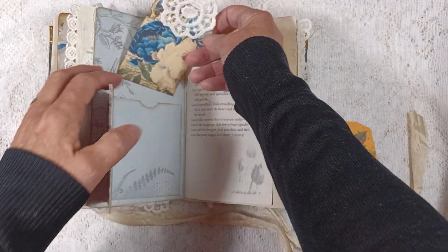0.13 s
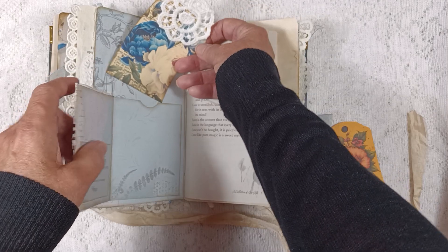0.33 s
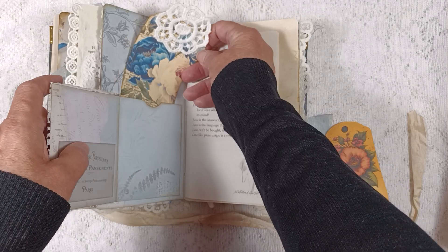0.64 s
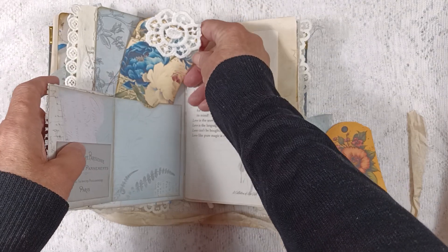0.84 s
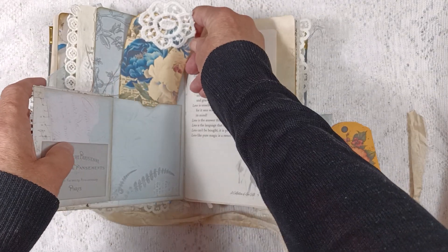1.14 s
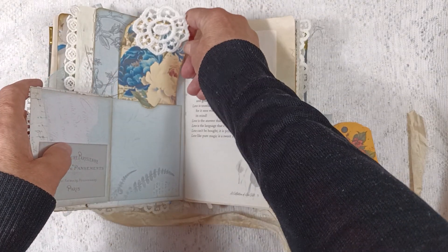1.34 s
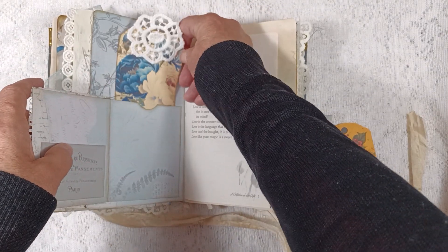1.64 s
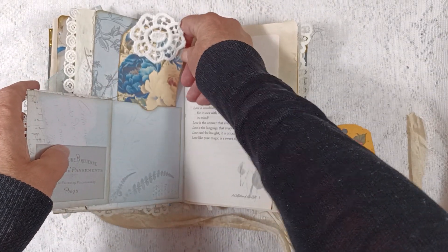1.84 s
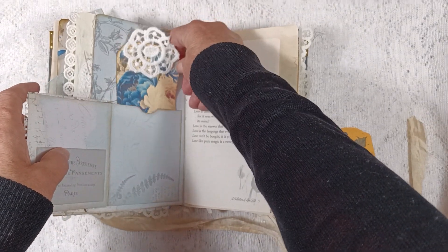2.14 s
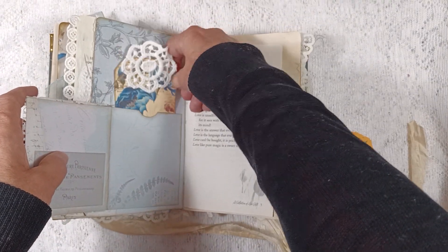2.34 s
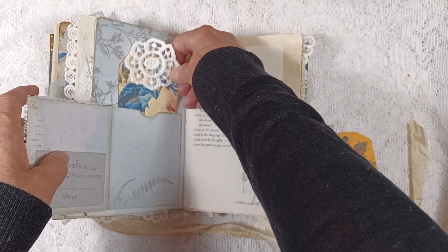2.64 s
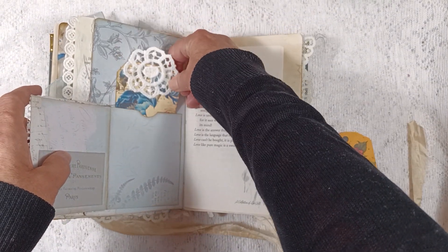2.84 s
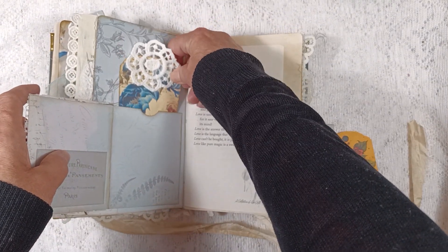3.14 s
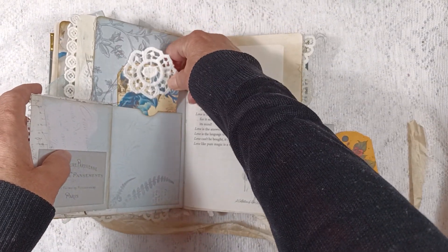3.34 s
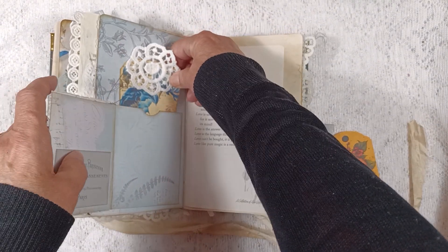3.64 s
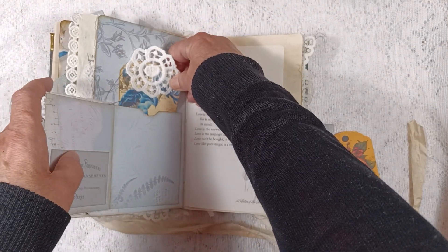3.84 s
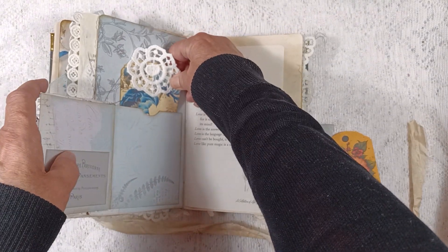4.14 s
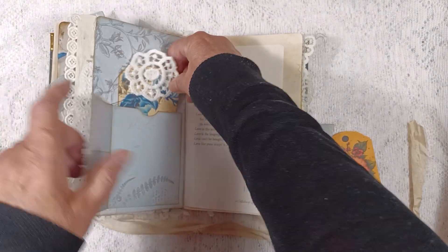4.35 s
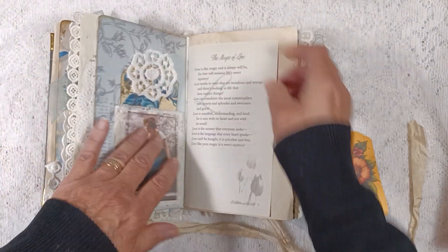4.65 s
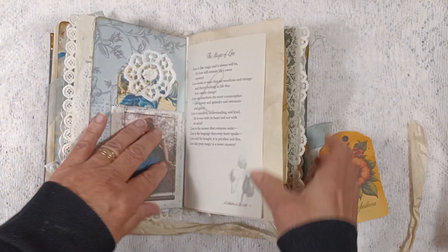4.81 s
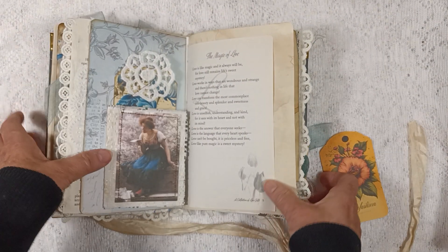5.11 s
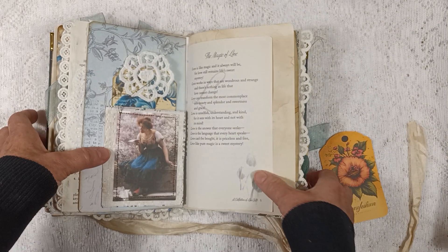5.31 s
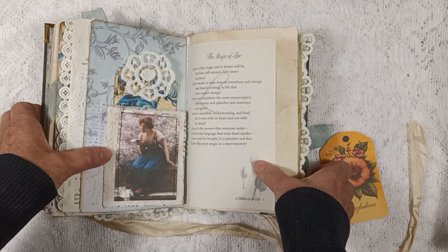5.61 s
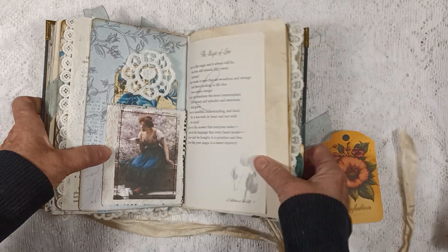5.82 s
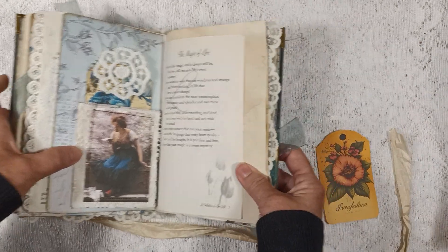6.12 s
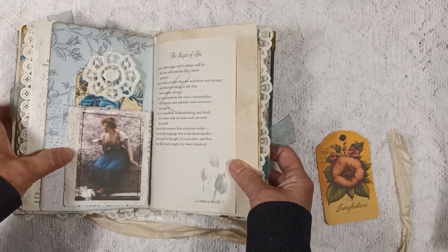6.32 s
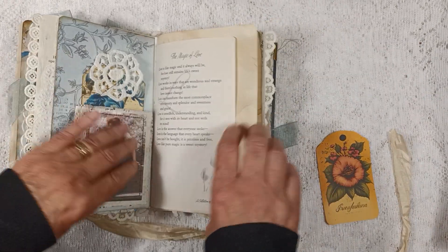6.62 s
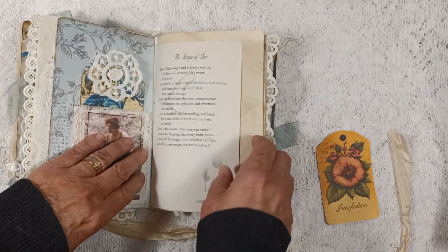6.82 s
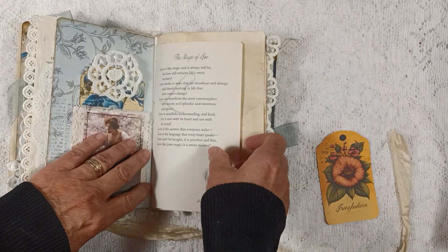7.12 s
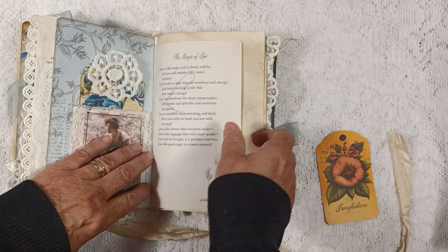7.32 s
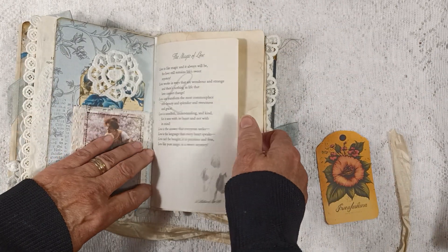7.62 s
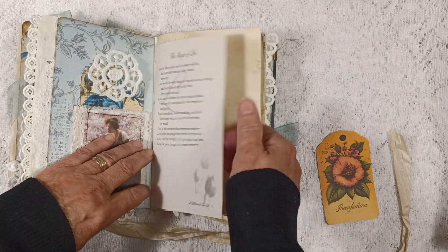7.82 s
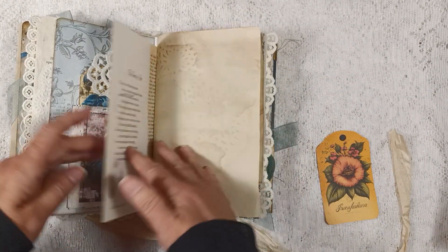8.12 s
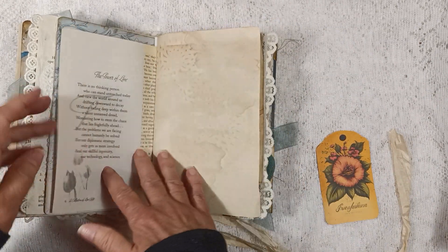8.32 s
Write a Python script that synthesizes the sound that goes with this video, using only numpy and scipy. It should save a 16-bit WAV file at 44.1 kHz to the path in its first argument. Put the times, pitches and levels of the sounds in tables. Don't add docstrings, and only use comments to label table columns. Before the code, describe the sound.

A quiet, nearly dry room, heard close over a table through a small mono microphone. From 0 to 0.8 s a card tag scrapes brightly on paper, with ticks and small crease snaps. From 0.8 to 1.4 s it enters a pocket in softer, slightly hollow rubs. Short shoves follow at 1.7 and 2.4-2.8 s, then sparse faint scuffs, nearly silent around 4 s. At 4.4-4.9 s a flap closes with crisp snaps and rustle. The book drags over cloth, swelling near 5.4 s, and settles with ticks and a sharp snap at 6.0 s. After a lull near 6.3 s, page handling bursts in at 6.55-6.8 s, the loudest rustle, then crackles, clicks and dull pops until 7.8 s. The page swings over in an airy brush and lands with a bright snap at 8.4 s. Soft low thumps and faint hiss lie beneath.

```python
import sys
import numpy as np
from scipy import signal
from scipy.fft import rfft, irfft, next_fast_len
from scipy.io import wavfile
from scipy.ndimage import uniform_filter1d, map_coordinates

SR = 44100
rng = np.random.default_rng(int(sys.argv[2]) if len(sys.argv) > 2 else 0)


def volts_from_db(level):
    exponent = np.asarray(level, float) / 20
    return 10 ** exponent


def transcribe(signal):
    frames = np.atleast_2d(signal).T
    limited = np.clip(frames, -1, 1)
    pcm = np.round(limited * 32767).astype(np.int16)
    wavfile.write(sys.argv[1], SR, pcm)


N = 373191

# (centre [Hz], width [Hz], level [dB])
DEEP_MODES = [(50.8, 9.6, -1.6), (81.5, 12.3, -0.39)]
HUM_MODES = [(124, 8.1, 1), (199, 40, -9)]
COVER_MODES = [(280, 42, 9.5), (439, 18, -1)]
# (deep [dB], hum [dB], cover [dB])
REST_DB = (-77, -75, -81)
# (time [s], level [dB], half length [s])
LEANS = [(.05, -69, 0.11), (0.774, -64, 0.16), (1.348, -65.5, 0.21), (1.94, -63.5, 0.086),
         (2.247, -65.5, 0.079), (2.81, -64, 0.099), (5.183, -74.5, 0.32), (5.412, -74, 0.2),
         (6.613, -67, 0.13), (7.266, -66, 0.038), (7.55, -71, 0.069), (8.4, -74, 0.12)]
# (time [s], hum level [dB], half length [s], cover modes over the hum [dB])
FLEXES = [(0.726, -69.5, 0.12, -5), (1.25, -73, 0.28, -10), (1.37, -61, 0.039, -6),
          (1.48, -65.5, 0.031, -15), (1.644, -62.5, 0.046, -17), (1.737, -62, 0.048, -3),
          (1.82, -62.5, .04, -4.5), (5.484, -81.5, 0.31, 7.5), (6.4, -64, 0.054, -2), (6.6, -65, 0.085, 0),
          (6.973, -85, 0.04, 19), (7.22, -73.5, 0.11, 7), (7.455, -63, 0.03, -21), (7.554, -87, 0.044, 9),
          (8.203, -74.5, 0.29, 1.5)]
# (frequency [Hz], density [dB per Hz])
AIR_COLOUR = [(210, -43), (350, 1.5), (914, 2.5), (1700, -3.5), (2200, 2), (2800, -2.5), (8570, -11.5),
              (10900, -24.5), (16000, -16)]
# (frequency [Hz], t60 [s])
ROOM_DECAY = [(200, 0.15), (2000, 0.11), (10000, 0.023)]

# (time [s], level [dB], pitch [Hz], length [s])
WHISTLES = [
    (3.153, -74, 1114, 0.05),
    (3.39, -76.5, 3900, 0.095),
    (4.142, -72, 1267, 0.061),
    (6.121, -74, 3470, 0.083),
]
# (time [s], peak [dB], pitch [Hz])
TICKS = [(0.5244, -32, 8800), (0.5444, -35, 8470), (0.552, -36, 8870), (1.0475, -47, 8450),
         (1.0679, -38, 8800), (3.1667, -44, 4500), (3.6424, -38, 8980), (4.5544, -31, 7890),
         (4.609, -33, 4600), (4.532, -39, 8600), (4.541, -32, 5640), (4.6623, -41, 8440),
         (5.0206, -36, 8600), (5.8436, -35, 8200), (5.8654, -28, 9100), (5.8898, -37, 8880),
         (5.918, -38, 7000), (6.0538, -30, 8700), (6.9641, -34, 7410), (7.05, -34, 8000),
         (7.1404, -37, 7500), (7.5494, -39, 8630), (7.1338, -35, 5000), (7.7124, -28.5, 3350),
         (7.9394, -36, 8700), (8.3914, -31, 7000)]
# (time [s], peak [dB], pitch [Hz], ring [cycles])
POPS = [(0.789, -52, 844, 14), (1.047, -52, 880, 3.7), (1.359, -52, 280, 4.1), (4.788, -52.5, 826, 17),
        (5.423, -33, 1010, 1.8), (5.853, -46, 1440, 3.6), (5.989, -52, 960, 4.2), (6.455, -50.5, 900, 17),
        (6.598, -50, 824, 7.7), (6.772, -39, 1380, 3.8), (6.936, -45, 800, 7.7), (6.9645, -32.5, 425, 2.7),
        (6.976, -32.5, 1330, 4.6), (7.1405, -40.5, 900, 4.9), (7.254, -42.5, 827, 10.6),
        (7.5359, -34, 405, 2.6), (7.55, -47, 420, 3.6), (7.6326, -30.5, 1430, 4.3),
        (7.64, -22.5, 785, 1.67), (7.805, -43.5, 1420, 9.7), (7.955, -51, 880, 7.3),
        (8.3906, -24, 4640, 10), (8.3896, -24.5, 3250, 8), (8.3979, -26.5, 6900, 20),
        (8.394, -43.5, 1070, 8.6)]
# (time [s], peak [dB], dull part over peak [dB], t60 [s])
SNAPS = [(0.618, -24, -26, 0.0078), (0.77, -30, -3, 0.013), (0.791, -47, 15, 0.021),
         (0.817, -37, 6, 0.013), (.837, -30, 2, .015), (.977, -50, 6, 0.025), (1.048, -44, -12, 0.016),
         (1.36, -30, -10, 0.02), (1.3782, -27, -26, 0.024), (1.659, -24.5, -11, 0.024),
         (1.905, -40, -10, 0.02), (2.35, -38.5, -24, 0.15), (2.455, -41, -16.5, 0.02),
         (2.7676, -35, -25, 0.021), (3.063, -47, 8, 0.017), (3.6155, -26, -24, 0.0087),
         (4.449, -37, -20, 0.029), (4.6033, -18.5, 1, 0.01), (4.66, -24.5, -8, 0.025),
         (4.789, -30, 13.5, 0.018), (4.9044, -32, -36, 0.035), (4.9267, -28.5, -24, 0.034),
         (5.9183, -32, -26, 0.011), (5.962, -30, -24, 0.021), (6.0079, -14.5, 9, 0.0064),
              (6.0374, -33, -15, 0.01), (6.0518, -28, -19, 0.007), (6.063, -31.5, -12, 0.026),
              (6.472, -31, -18, 0.015), (6.55, -17, -6, 0.012), (6.7468, -22, -22, 0.025),
              (6.9344, -19, 3, 0.008), (6.966, -22, 16, 0.0059), (6.978, -20, -12, 0.013),
              (7.133, -24.5, -16, 0.02), (7.533, -22, 11.5, 0.018), (7.552, -23, -20, 0.014),
              (7.633, -19, -8, 0.012), (7.715, -28, -6, .008), (7.8042, -18, 2, 0.027),
              (7.834, -18, -22, 0.0099), (8.245, -39, -10, 0.0091), (8.389, -30, 10, 0.014),
              (8.397, -36, -11, 0.014)]

# (centre [Hz], width [Hz], level [dB])
POCKET_MODES = [(1880, 1040, -3), (2990, 780, -0.5)]
BODY_MODES = [(532, 370, -2.5), (900, 97, 4.5), (1550, 455, 2)]
# (centre [Hz], width [Hz], level [dB])
COARSE_BANDS = [(4120, 1330, 0), (5705, 650, 2.5)]
FINE_BANDS = [(6650, 910, -3.5), (8916, 594, -0.5)]
# (frequency [Hz], density [dB per Hz])
SHEEN_COLOUR = [(9000, -9.5), (9900, 9), (12000, 9.5), (15500, 8.5), (16500, -40)]
# (time [s], pocket [Hz], body [Hz], strength of both resonances [dB], facing the microphone [dB])
HOLD = [(0.1, 2680, 860, 10.5, 12), (.29, 2500, 1510, 8, 4), (.45, 2410, 1010, 13, 5.5),
        (.8, 2390, 820, 22, -11), (1.08, 2400, 870, 24, -4), (1.25, 2520, 840, 11, -13),
        (1.4, 2650, 850, 30, -6), (1.7, 2450, 900, 14.5, -7), (2.42, 2870, 850, 12.5, -6.5),
        (4.1, 2930, 1200, 3, -10), (4.55, 2300, 1430, 2, 3.5), (4.75, 2930, 900, 3, 8),
        (5.0, 2800, 1810, 12.5, 1), (5.36, 1890, 1460, 8, -7), (5.43, 1690, 515, 3, -11),
        (5.72, 2300, 1500, -24, 5.5), (6.6, 2600, 1400, -12, -1.5), (6.78, 3280, 1400, 3, -5),
        (6.9, 2620, 1310, -1, -4.5), (7.4, 3200, 890, 5, -18), (7.9, 2950, 1300, -7, -1.5),
        (8.1, 3070, 900, 15, 8), (8.25, 3420, 644, 12.5, 0.5)]
# (time [s], coarse hiss [dB], pocket ring [dB])
GRIT = [(0, 3, 0.5), (.8, 1, 2.5), (.95, -4, 0), (1.05, 1, 3), (1.2, -1.5, -3), (1.4, 1.5, -3.5),
        (1.68, 0, 1.5), (1.82, -1.5, 6.5), (2.2, 0.5, -1), (2.38, 2.5, -4.5), (2.8, 1.5, 1.5),
        (3.35, 2.5, -5.5), (3.62, 1.5, -8), (4.45, -1, -7), (4.55, 0, 0), (4.7, 2, 7.5), (5.0, -1.5, -3),
        (6.5, -4, -6), (6.6, -7, -9), (6.69, -4, -6), (6.8, 5, 0.5), (7.15, -2, -2.5), (7.8, 2, 1.5),
        (7.95, -1, -1), (8.23, 5.5, -2), (8.4, 0.5, -0.5)]
# (time [s], centre [Hz], width [octaves], depth [dB])
SHADE = [(.88, 6030, 0.21, 1.5), (.95, 6700, 0.17, 24), (1.0, 6740, 0.33, -0.5), (1.65, 1450, 0.38, 1.5),
         (2.43, 1450, 0.33, 8), (2.5, 1580, 0.45, 6), (4.4, 1500, 0.63, 7), (4.53, 1510, 0.36, -2),
         (5.08, 4650, 0.22, 1), (5.12, 4600, 0.33, 12), (5.25, 4330, 0.23, 7), (5.49, 3520, 0.58, 3.5),
         (5.53, 3580, 0.95, 8.5), (5.66, 3670, 3.8, 19), (5.7, 3620, 0.86, 3.5), (6.45, 6500, 0.5, 2.5),
         (6.53, 6600, 0.14, 11), (6.62, 6860, 0.18, 2.5), (7.9, 597, 0.45, -1), (7.97, 700, .5, 11),
         (8.04, 1265, 0.76, 4), (8.1, 2400, 1.1, 14), (8.14, 4470, 0.4, -1), (8.17, 5970, .3, 1.5),
         (8.255, 1200, 0.57, 2), (8.275, 1530, 0.63, -5), (8.38, 1600, 0.55, 5), (8.392, 1400, 0.54, -4)]

# (time of peak [s], fibre hiss [dB], rise [s], fall [s], weight on the sheet [dB])
SEEK = [
    (0.018, -44.5, 0.44, 0.23, -4.5),
    (.062, -46, 0.022, 0.027, -18),
    (.22, -51.5, 0.1, 0.82, 4.5),
    (.42, -52, 0.96, 0.13, -13.5),
    (.51, -47.5, 0.027, 0.086, 4),
    (.547, -46, 0.081, 0.26, -13),
    (.708, -44.5, 0.038, 0.058, -12),
]
ENTER = [
    (.832, -56, 0.38, 0.086, 8),
    (.984, -54.5, 0.017, 0.18, -4),
    (1.045, -48, 0.037, 0.035, 1.5),
    (1.085, -45.5, 0.059, 0.079, 0.5),
    (1.13, -52, 0.054, 0.039, 3.5),
    (1.205, -57.5, 0.014, 0.065, 1),
    (1.29, -57, 0.16, 0.089, 2.5),
    (1.402, -51.5, 0.065, 0.041, 4.5),
]
PUSH = [(1.662, -44, 0.01, 0.04, -14), (1.701, -43.5, 0.05, 0.06, 3.5), (1.765, -56.5, 0.088, 0.12, 12),
        (1.803, -49, 0.015, 0.038, 15.5), (1.826, -53, 0.039, 0.035, -2), (1.55, -73, 0.15, 0.088, 5),
        (1.91, -54, 0.02, .04, -4), (1.94, -58, 0.068, 0.033, -5), (2.2, -59, 0.19, 0.64, 8),
        (2.28, -53, 0.02, 0.24, 6.5), (2.36, -50, 0.04, 0.053, 3), (2.4, -49.5, 0.07, 0.027, 9.5),
        (2.468, -40, 0.021, 0.0044, -1), (2.48, -53.5, 0.025, 0.077, -20),
        (2.569, -63.5, 0.0048, 0.027, -11), (2.61, -58.5, 0.017, 0.067, 0), (2.771, -47, 0.018, 0.08, -22),
        (2.799, -46.5, 0.044, 0.036, -12), (2.87, -63, 0.12, 0.093, 1), (3.07, -52.5, 0.015, .07, -9),
        (3.11, -54, 0.057, 0.064, 1), (3.32, -57, 0.028, 0.11, 4), (3.375, -52.5, 0.093, 0.018, -8),
        (3.65, -64.5, .02, 0.045, -23), (3.617, -43, 0.01, 0.029, -40), (3.8, -72.5, 0.088, 0.057, -14),
        (4.164, -70, 0.054, 0.044, 16.5), (3.865, -74, 0.013, 0.026, -10), (4.343, -48.5, 0.016, 0.02, -8),
        (4.33, -57, 0.052, 0.06, 4), (4.385, -60.5, 0.066, 0.043, 9.5)]
SHIFT = [(4.455, -52.5, 0.014, 0.29, -11.5), (4.525, -49.5, 0.014, 0.046, 8), (4.552, -49, 0.051, 0.041, 1),
         (4.6, -51.5, 0.068, 0.076, 3.5), (4.668, -46, 0.078, 0.16, -11), (4.732, -44, 0.036, 0.076, -16),
         (4.784, -48.5, 0.029, 0.049, 5.5), (4.928, -47.5, 0.027, 1, -6), (5.15, -58.5, 0.33, 0.82, 24),
         (5.29, -50.5, 0.29, 0.11, -2), (5.352, -41, 0.08, 0.066, 2), (5.392, -43, 0.1, 0.023, 2)]
SETTLE = [(5.44, -51.5, 0.07, 0.15, 16), (5.57, -49, 0.044, 0.096, 8), (5.629, -60, 0.059, 0.12, 32),
          (5.709, -54, 0.057, 0.043, 9.5), (5.75, -58.5, .04, 0.1, 13), (5.798, -49, 0.025, 0.022, 6.5),
          (5.838, -45.5, 0.066, 0.11, 0), (5.972, -50.5, 0.039, 0.066, -2), (6.01, -48, 0.055, 0.15, -0.5),
          (6.12, -61.5, 0.61, 0.097, 14), (6.308, -70, 0.057, 0.19, 17), (6.361, -62.5, 0.025, 0.13, 0),
          (6.461, -61, 0.22, 0.21, 3.5)]
TURN = [(6.526, -49, 0.0097, 0.055, -12), (6.553, -37.5, 0.041, 0.026, -1), (6.58, -42.5, 0.057, 0.2, -3.5),
        (6.698, -39, 0.097, 0.038, 2), (6.756, -34.5, 0.018, 0.054, -5), (6.775, -36, 0.04, 0.065, 2),
        (6.813, -38.5, 0.089, 0.06, 0), (6.982, -43.5, 0.16, 0.1, 7.5), (7.034, -41, 0.032, 0.05, 4),
        (7.052, -43, 0.033, 0.044, 3), (7.135, -43.5, 0.014, 0.02, 10.5), (7.11, -49, 0.13, 0.094, 4.5),
        (7.262, -41, .15, 0.12, 4.5), (7.295, -45.5, 0.051, 0.13, -5.5), (7.4, -52, 0.14, 0.083, 9),
        (7.464, -46, 0.054, 0.12, 5.5), (7.55, -46.5, 0.028, 0.34, 6), (7.711, -46, 0.2, 0.084, 4.5)]
SWING = [
    (7.807, -47, 0.018, 0.42, 10.5),
    (7.93, -47.5, 0.18, 0.29, -3.5),
    (8.09, -56, 0.15, 0.2, -23),
    (8.18, -52, 0.12, 0.094, 11),
    (8.239, -44.5, 0.1, 0.041, 4.5),
    (8.31, -48.5, 0.24, 0.44, -8.5),
    (8.398, -41.5, 0.028, 0.048, 7.5),
]
# (pocket ring [dB], sheet body [dB], sheen [dB], coarse over fine [dB])
SHEETS = [
    (-7, -13, -18.5, -2),
    (-2.5, -15, -21, -3),
    (-6, -19.5, -16.5, -3),
    (-12, -13.5, -14.5, -4),
    (-5.5, -15, -15.5, 2.5),
    (-9.5, -14.5, -12.5, -3.5),
    (-5, -16.5, -14.5, -3),
]
# (pocket [dB/dB], body [dB/dB], sheen [dB/dB], coarseness [dB/dB])
WEIGHT_MOVES = (0.19, 1.34, -0.2, 0.16)
# (pocket [dB/dB], body [dB/dB], sheen [dB/dB], coarseness [dB/dB])
FACING_MOVES = (-0.091, 0.25, 0.46, -0.16)
# (pocket [s], body [s], sheen [s], coarse hiss [s])
LAG_S = (0.0016, 0.016, .001, 0.0019)


def unit(x):
    return x / np.sqrt(np.mean(x ** 2) + 1e-20)


def along(points, hz):
    f, v = np.transpose(points)
    return np.interp(np.log(hz + 1), np.log(f + 1), v)


def curves(rows):
    s, *cols = np.transpose(rows)
    return [np.interp(np.arange(N) / SR, s, c) for c in cols]


def wobble(rate):
    knots = rng.standard_normal(int(N * rate / SR) + 4)
    return map_coordinates(knots, [np.arange(N) * rate / SR])


def filtered(x, response):
    m = next_fast_len(len(x) + 8192)
    return irfft(rfft(x, m) * response(np.fft.rfftfreq(m, 1 / SR)), m)[:len(x)]


def coloured(x, points):
    return filtered(x, lambda f: volts_from_db(along(points, f)))


def no_bass(corner_hz):
    return lambda f: (1j * f / corner_hz / (1 + 1j * f / corner_hz)) ** 2


def modes(table):
    def response(f):
        total = 0
        for k, (centre, width, db) in enumerate(table):
            damping = 1j * f * width
            total = total + (-1) ** k * volts_from_db(db) * damping / (centre ** 2 - f ** 2 + damping)
        return total
    return response


def steep(table):
    low_hz, high_hz = 0.53 * table[0][0], 1.37 * table[-1][0]
    return lambda f: modes(table)(f) * no_bass(low_hz)(f) / (1 + (f / high_hz) ** 8)


def even(x, span_s, share):
    power = np.abs(uniform_filter1d(x ** 2, int(span_s * SR))) + 1e-20
    return unit(x / power ** (share / 2))


def patchy(x, depth_db):
    z = signal.stft(x, nperseg=512)[2]
    field = uniform_filter1d(rng.standard_normal(z.shape), 2, axis=0)
    field = uniform_filter1d(field, 8, axis=1)
    return signal.istft(z * volts_from_db(depth_db * unit(field)), nperseg=512)[1][:N]


def swells(rest_db, rows):
    t = np.arange(0, N + 64, 64) / SR
    power = volts_from_db(2 * rest_db)
    for s, db, half_s in rows:
        power = power + volts_from_db(2 * db) * np.exp(-2 * ((t - s) / half_s) ** 2)
    return np.interp(np.arange(N) / SR, t, np.sqrt(power))


def house():
    hum_rows = [(s, db, half_s) for s, db, half_s, _ in FLEXES]
    cover_rows = [(s, db + over_db, half_s) for s, db, half_s, over_db in FLEXES]
    deep_db, hum_db, cover_db = REST_DB
    low = 0
    for table, rest_db, rows, wobble_hz in ((DEEP_MODES, deep_db, LEANS, 8), (HUM_MODES, hum_db, hum_rows, 12),
                                            (COVER_MODES, cover_db, cover_rows, 16)):
        rumble = even(filtered(rng.standard_normal(N), steep(table)), span_s=0.12, share=1.0)
        low = low + swells(rest_db, rows) * volts_from_db(1.74 * wobble(wobble_hz)) * rumble
    air = coloured(patchy(rng.standard_normal(N), depth_db=4.0), AIR_COLOUR)
    return low + volts_from_db(-74) * unit(air)


def room(x):
    hz, t, z = signal.stft(rng.standard_normal(SR // 2), SR, nperseg=256)
    fade = volts_from_db(-60 * t / along(ROOM_DECAY, hz)[:, None])
    tail = signal.istft(z * fade, SR, nperseg=256)[1]
    delayed = np.pad(x, (300, 0))
    return signal.fftconvolve(delayed, tail / np.linalg.norm(tail))[:N]


def edges():
    out = np.zeros(N)
    for s, db, hz, length_s in WHISTLES:
        t = np.arange(round(length_s * SR)) / SR
        drift = np.cumsum(rng.normal(0, 0.07, len(t)))
        whistle = np.sin(np.pi * t / length_s) * np.sin(2 * np.pi * hz * t + drift)
        out[round(s * SR):][:len(t)] += volts_from_db(db + 5.0) * whistle
    return out


def ticks():
    out, t = np.zeros(N + SR), np.arange(SR // 200) / SR
    for s, db, hz in TICKS:
        fade = volts_from_db(db + 2 - 20 * t * hz / 4.2)
        out[round(s * SR):][:len(t)] += fade * np.sin(2 * np.pi * hz * t)
    return filtered(out[:N], no_bass(1500))


def pops():
    out, t = np.zeros(N + SR), np.arange(SR // 10) / SR
    rise = 1 - np.exp(-t / 0.0006)
    for s, db, hz, cycles in POPS:
        fade = volts_from_db(-26 * t * hz / cycles) * rise
        overtone_hz = hz * rng.uniform(1.72, 2.15)
        swing = np.sin(2 * np.pi * hz * t) + 0.32 * np.sin(2 * np.pi * overtone_hz * t)
        out[round(s * SR):][:len(t)] += volts_from_db(db + 5.5) * fade * swing
    return filtered(out[:N], no_bass(160))


def snaps():
    sharp, dull = np.zeros((2, N + SR))
    t = np.arange(SR // 8) / SR
    for s, db, dull_db, t60 in SNAPS:
        spray = (1 - np.exp(-t / 0.0055)) * volts_from_db(-60 * t / t60) * rng.standard_normal(len(t))
        spray[0] = 1.4 - 0.014 * (db + 39)
        start = round(s * SR)
        sharp[start:][:len(t)] += volts_from_db(db + 10.5) * spray
        dull[start:][:len(t)] += volts_from_db(db + dull_db + 10.5) * spray
    sharp, dull = sharp[:N], dull[:N]
    sheen_db, coarse_db = strokes()[3:]
    bright = filtered(sharp, steep(FINE_BANDS)) + volts_from_db(coarse_db - 7.5) * filtered(sharp, steep(COARSE_BANDS))
    thud = volts_from_db(-11.0) * filtered(dull, steep(BODY_MODES[2:] + POCKET_MODES))
    return bright + thud + volts_from_db(sheen_db - 13.5) * coloured(sharp, SHEEN_COLOUR)


def strokes():
    t = np.arange(0, N + 64, 64) / SR
    power, mix = 1e-12, 0
    for table, sheets in zip((SEEK, ENTER, PUSH, SHIFT, SETTLE, TURN, SWING), SHEETS):
        for s, db, rise_s, fall_s, weight_db in table:
            rising = abs((s - t) / rise_s) ** 1.254
            falling = abs((t - s) / fall_s) ** 1.296
            drop = np.where(t < s, rising, falling)
            p = volts_from_db(2 * np.maximum(db - 20 * drop, -140))
            colour_db = np.add(sheets, np.multiply(WEIGHT_MOVES, weight_db))
            power = power + p
            mix = mix + np.outer(colour_db, p)
    level_db = 10 * np.log10(power)
    late_db = [np.clip(np.interp(t - lag, t, level_db) - level_db, -18, 5) for lag in LAG_S]
    hiss_db, *colours = [np.interp(np.arange(N) / SR, t, c) for c in [level_db, *(mix / power + late_db)]]
    facing_db = curves(HOLD)[3]
    grit_db, ring_db = curves(GRIT)
    contact = np.array([0.33 * ring_db, 0.11 * ring_db, 0.079 * ring_db, grit_db])
    return [hiss_db, *(colours + np.outer(FACING_MOVES, facing_db) + contact)]


def fibres(per_s, scatter_db, clump_db):
    sizes = volts_from_db(scatter_db * np.minimum(rng.exponential(size=N), 3))
    clicks = (rng.random(N) < per_s / SR) * sizes * np.sign(rng.standard_normal(N))
    slips = 0.58 * rng.standard_normal(N) + 0.41 * unit(clicks)
    return slips * volts_from_db(clump_db * wobble(90))


def moving(x, centre_hz, width_hz, lift_db):
    f, t, z = signal.stft(x, SR, nperseg=512)
    now = np.minimum(t * SR, N - 1).astype(int)
    detune = (f[:, None] - centre_hz[now]) / width_hz
    lifted = z * np.hypot(1, volts_from_db(lift_db[now]) / (1 + detune ** 2))
    gain = np.sum(abs(lifted) ** 2, 0) / (np.sum(abs(z) ** 2, 0) + 1e-20)
    return signal.istft(lifted / np.sqrt(gain + 1e-20), SR, nperseg=512)[1][:N]


def rubbing():
    hiss_db, pocket_db, body_db, sheen_db, coarse_db = strokes()
    pocket_hz, body_hz, lift_db = curves(HOLD)[:3]
    slips = fibres(per_s=2500, scatter_db=4.0, clump_db=0.34)
    ring_streaks = patchy(slips, depth_db=4.0)
    hiss_streaks = patchy(slips, depth_db=4.0)

    coarse = even(filtered(hiss_streaks, steep(COARSE_BANDS)), span_s=0.03, share=0.62)
    fine = even(filtered(hiss_streaks, steep(FINE_BANDS)), span_s=0.03, share=0.62)
    hiss = (volts_from_db(coarse_db) * coarse + fine) / np.hypot(1, volts_from_db(coarse_db))

    pocket = moving(filtered(ring_streaks, steep(POCKET_MODES)), pocket_hz, width_hz=400, lift_db=lift_db - 3.0)
    pocket = even(pocket, span_s=0.048, share=0.84)
    body = moving(filtered(ring_streaks, steep(BODY_MODES)), body_hz, width_hz=120, lift_db=lift_db + 1.0)
    body = even(body, span_s=0.037, share=0.51)
    sheen = unit(coloured(patchy(slips[::-1], depth_db=2.5), SHEEN_COLOUR))

    paper = hiss + volts_from_db(pocket_db) * pocket + volts_from_db(body_db) * body + volts_from_db(sheen_db) * sheen
    return volts_from_db(hiss_db - 0.47) * paper


def shaded(x):
    f, t, z = signal.stft(x, SR, nperseg=512)
    now = np.minimum(t * SR, N - 1).astype(int)
    hz, octaves, depth_db = (c[now] for c in curves(SHADE))
    distance = np.log2((f[:, None] + 1) / hz) / octaves
    return signal.istft(z * volts_from_db(-depth_db * np.exp(-distance ** 2)), SR, nperseg=512)[1][:N]


def scene():
    paper = shaded(rubbing()) + ticks() + snaps() + pops() + edges()
    return (paper + volts_from_db(-12.5) * room(paper) + house())[None]


def top_cut(x):
    return signal.sosfilt(signal.butter(12, 15850, fs=SR, output="sos"), x)


def record(dry):
    return top_cut(dry)


dry = scene()
out = record(dry)
transcribe(out)
```